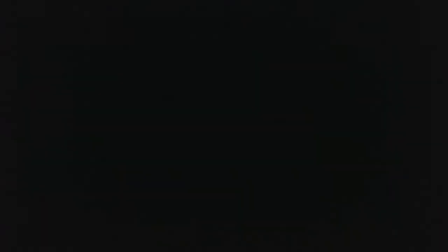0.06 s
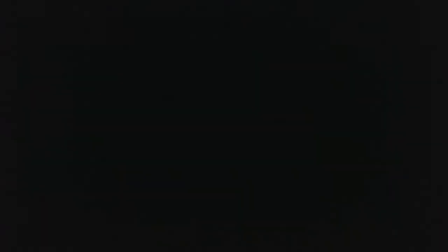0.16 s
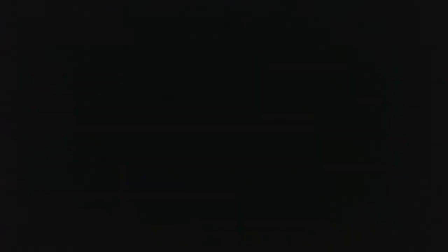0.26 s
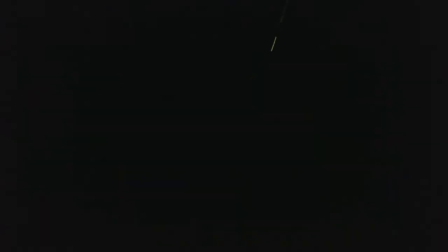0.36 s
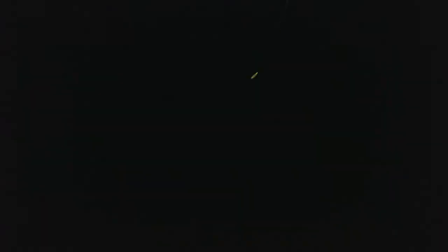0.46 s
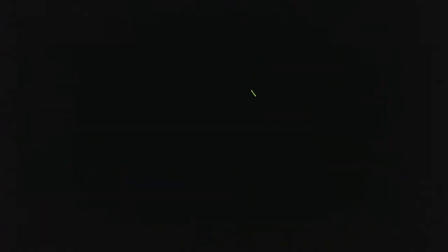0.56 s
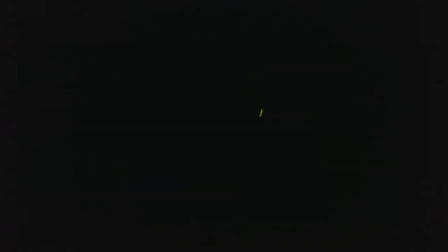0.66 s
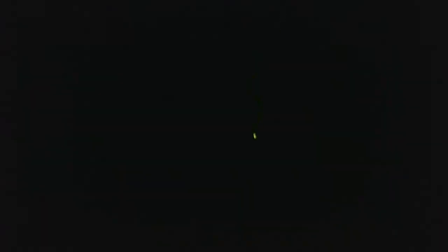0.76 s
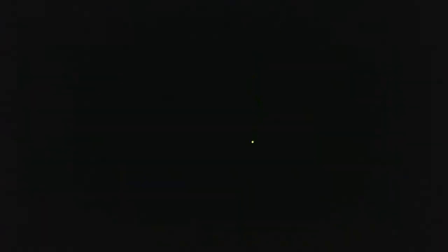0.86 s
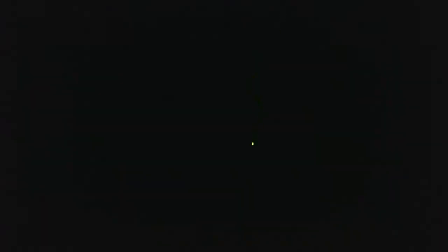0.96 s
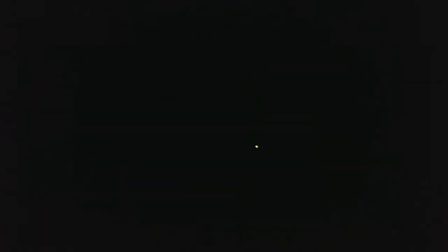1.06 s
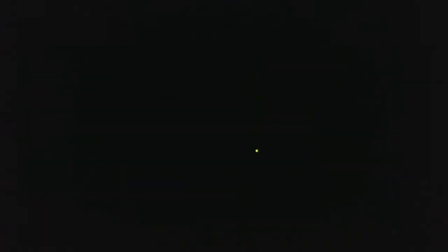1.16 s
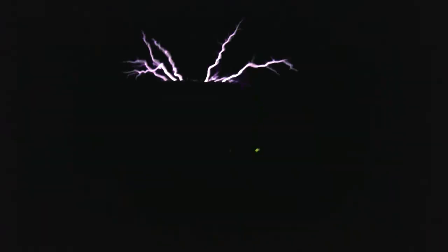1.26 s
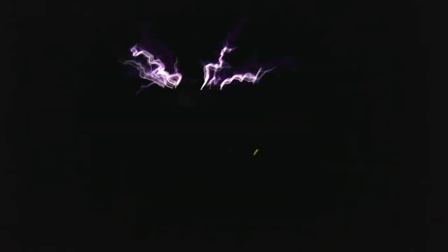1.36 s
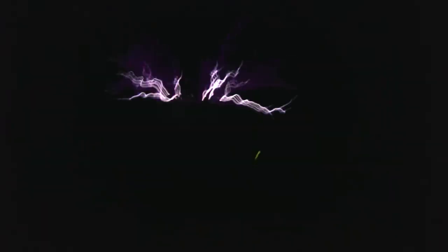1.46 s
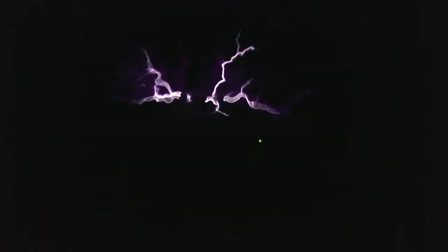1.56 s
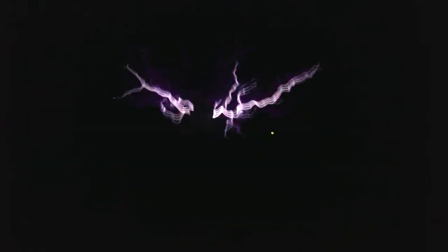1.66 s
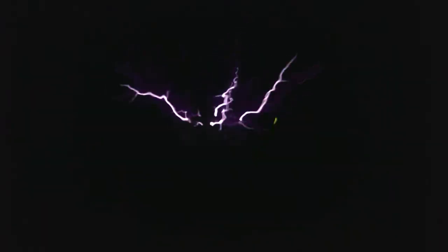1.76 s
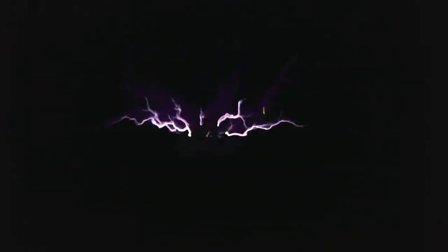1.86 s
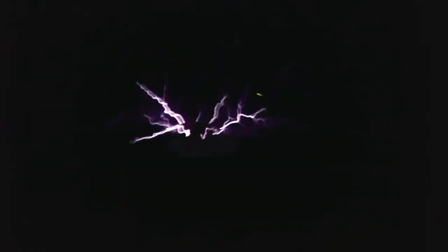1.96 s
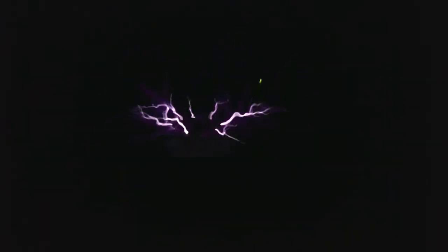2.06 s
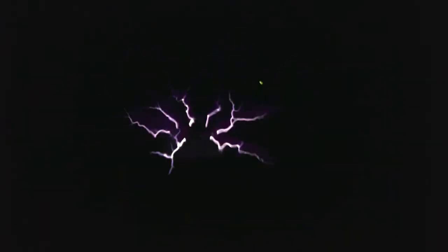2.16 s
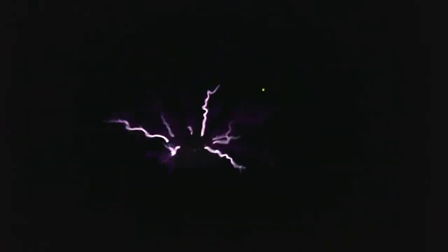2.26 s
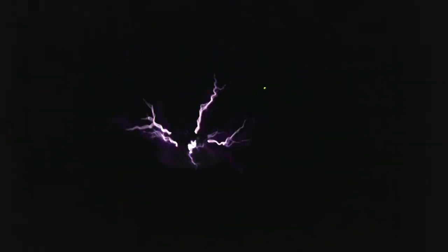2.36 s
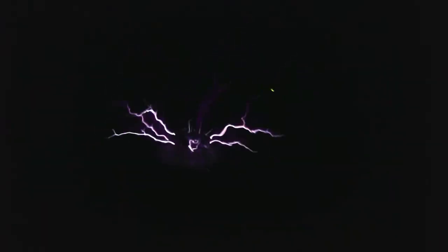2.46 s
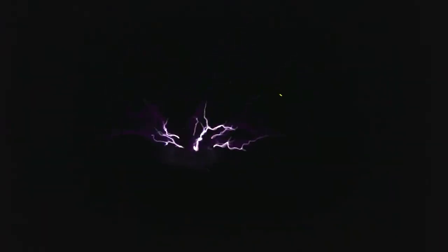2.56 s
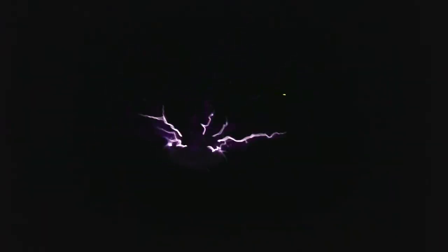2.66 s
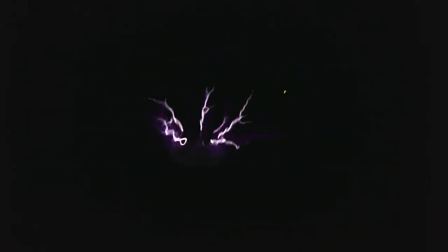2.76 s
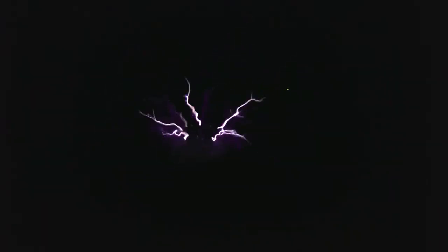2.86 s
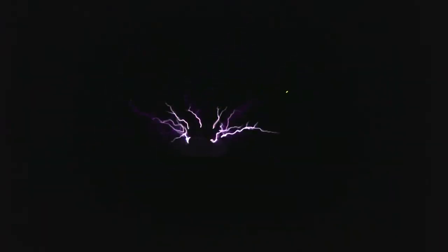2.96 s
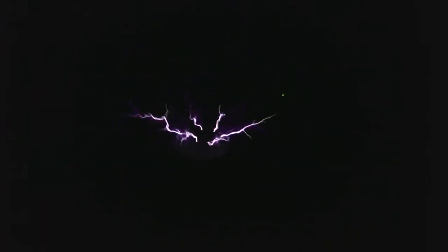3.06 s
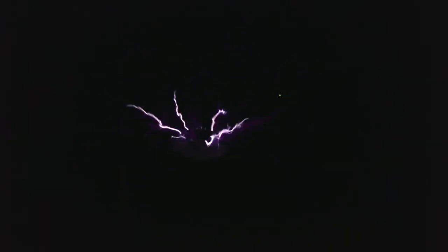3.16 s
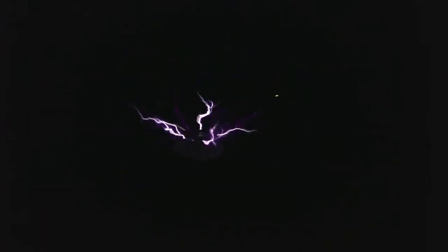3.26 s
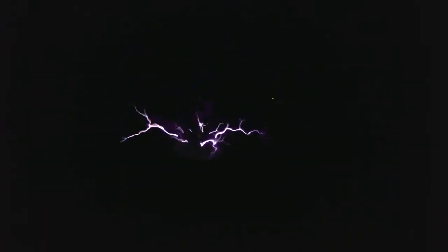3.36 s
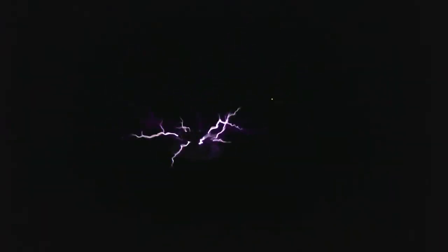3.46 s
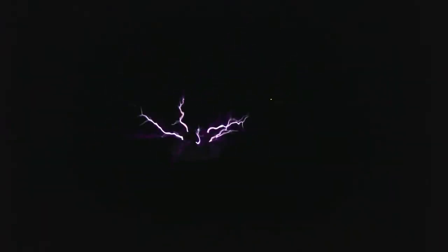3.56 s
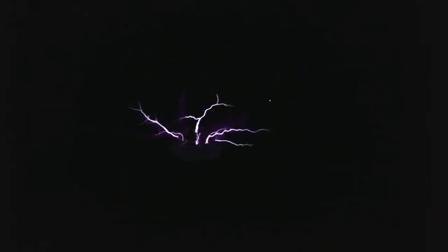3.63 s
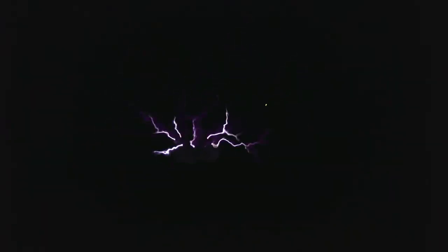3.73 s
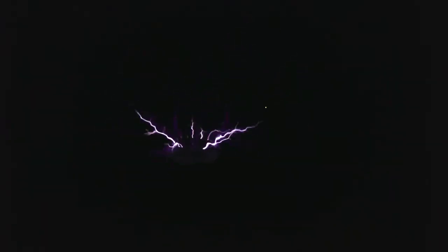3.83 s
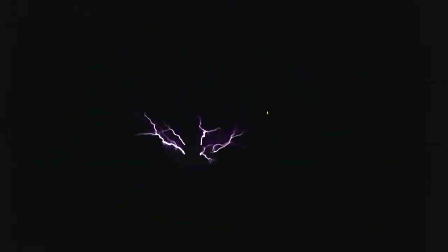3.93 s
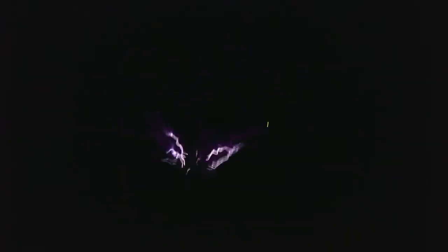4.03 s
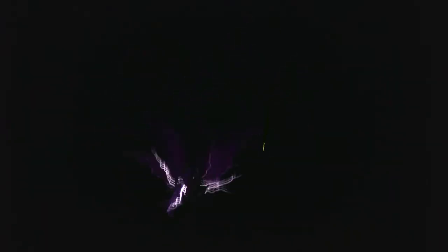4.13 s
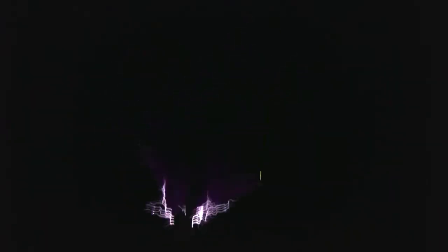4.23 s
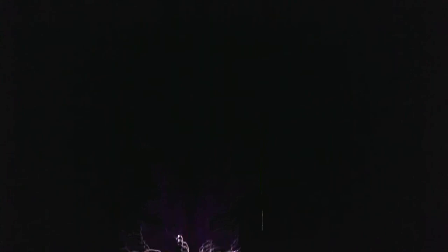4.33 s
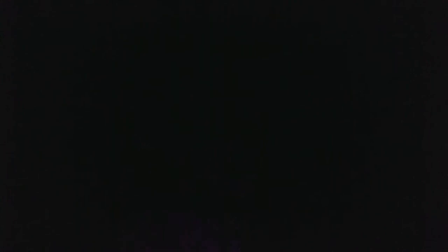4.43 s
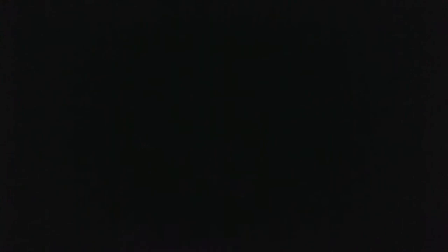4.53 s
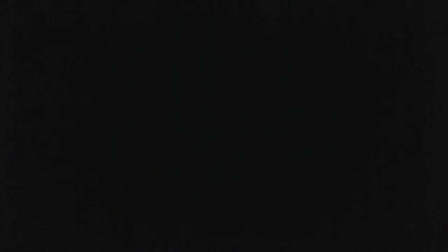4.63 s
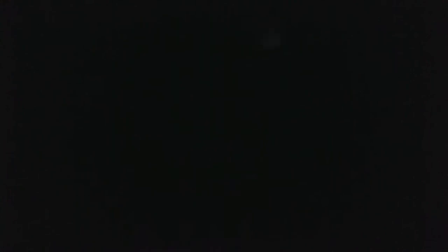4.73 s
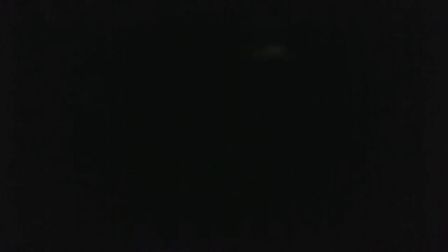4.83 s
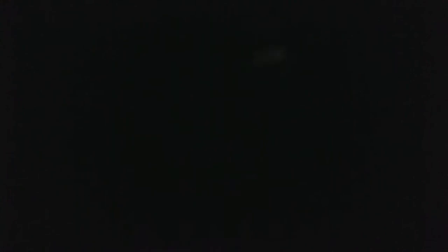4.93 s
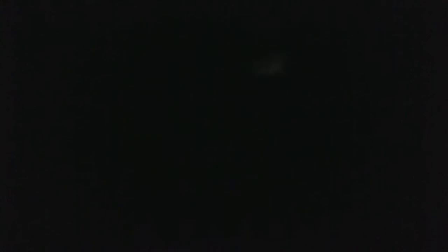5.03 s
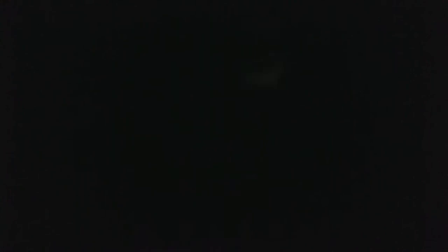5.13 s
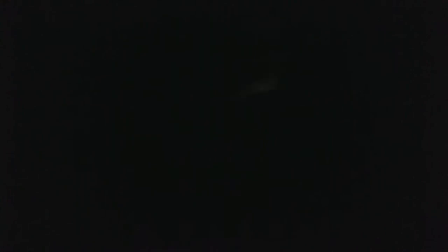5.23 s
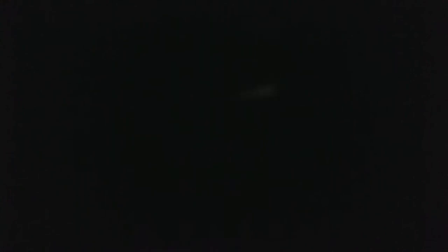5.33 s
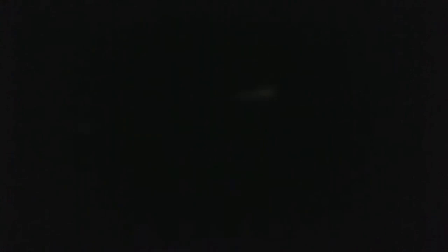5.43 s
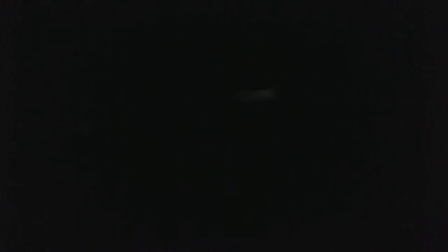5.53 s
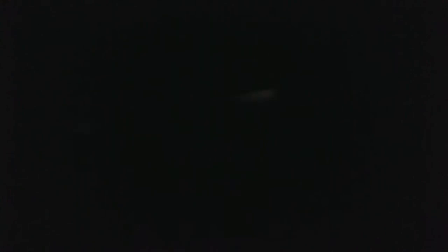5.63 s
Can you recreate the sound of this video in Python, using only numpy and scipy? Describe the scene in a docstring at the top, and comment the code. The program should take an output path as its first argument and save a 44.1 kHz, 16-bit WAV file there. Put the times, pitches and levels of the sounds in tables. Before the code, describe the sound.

After a faint rustle and a dull thud, a high-voltage coil snaps to life, its sparks sizzling loudly and steadily over a faint hum.

```python
"""A soft rustle and a small knock sound in a quiet garage, then a thud on a panel, a low throb, a faint
whine and a few ticks. A high-voltage coil switches on with a crack as the air breaks down. Dense sparks,
pulsing at twice the mains frequency, leap from several streamers, and reverberation blurs them into a
hissing crackle over the transformer hum. The listener moves through four spots, and at each the
standing waves of the room colour the crackle differently."""
import sys
import numpy as np
from scipy import signal
from scipy.fft import rfft, irfft, next_fast_len
from scipy.io import wavfile

SR = 44100
rng = np.random.default_rng(int(sys.argv[2]) if len(sys.argv) > 2 else 0)


def materialize(psi):
    """Save the field psi as 16-bit PCM at rate SR to the path in sys.argv[1].

    A 1-D psi becomes a single channel; in a 2-D psi each row is a channel.
    """
    bounded = np.clip(np.atleast_2d(psi).T, -1, 1)
    quanta = np.round(bounded * 32767).astype(np.int16)
    wavfile.write(sys.argv[1], SR, quanta)


N = 250929
TIME = np.arange(N) / SR
FFT_SIZE = next_fast_len(N + SR)
HZ = np.maximum(np.arange(FFT_SIZE // 2 + 1) * SR / FFT_SIZE, 1)
COIL_ON_S, CRACK_S, MAINS_HZ = 1.2183, 1.2299, 60


def from_db(db):
    """Amplitude grows tenfold for every 20 dB."""
    return 10 ** (np.asarray(db) / 20)

def unit_rms(x):
    """Normalisation to unit mean power."""
    return x / np.sqrt(np.mean(x ** 2) + 1e-20)

def ramp(start_s, length_s):
    """Linear rise from 0 to 1; a negative length gives a fall that ends at start_s."""
    return np.clip((TIME - start_s) / length_s, 0, 1)

def decay(start_s, t60):
    """Exponential damping: unity until the start, then 60 dB down every t60 seconds, for one second."""
    return from_db(-60 * np.clip(TIME - start_s, 0, 1) / t60)

def burst(start_s, t60):
    """White noise with a sudden onset and exponential decay."""
    return rng.standard_normal(N) * (TIME >= start_s) * decay(start_s, t60)

def spectrum(points):
    """Interpolation of a curve over logarithmic frequency."""
    hz, value = np.transpose(points)
    return np.interp(np.log(HZ), np.log(hz), value)

def cut(x, order, hz, kind="low"):
    """Maximally flat low-pass or high-pass filtering."""
    return signal.sosfilt(signal.butter(order, hz, kind, fs=SR, output="sos"), x)

def resonate(x, hz, width_hz):
    """A damped oscillator driven by x; a unit impulse rings with height 1."""
    r, w = np.exp(-np.pi * width_hz / SR), 2 * np.pi * hz / SR
    return signal.lfilter([0, np.sin(w)], [1, -2 * r * np.cos(w), r * r], x + 1e-18)

def lift(hz, width_hz, db):
    """Frequency response of one resonant peak or dip."""
    return 1 + (from_db(db) - 1) / (1 + 2j * (HZ - hz) / width_hz)

def microphones(mid, side, coherence, colour=1):
    """Partial coherence: shared (mid) and opposed (side) spectra add into left and right signals."""
    alike = np.clip(spectrum(coherence), -1, 1)
    mid, side = colour * np.sqrt(1 + alike) * mid, colour * np.sqrt(1 - alike) * side
    return irfft(np.array([mid + side, mid - side]), FFT_SIZE)[:, :N] / np.sqrt(2)

def stereo_noise(colour, coherence):
    """A partly coherent noise field of unit power with a given spectral shape."""
    mid, side = rfft(rng.standard_normal((2, N)), FFT_SIZE)
    return unit_rms(microphones(mid, side, coherence, colour))

def garage(x, echo_db, t60=0.7, treble_t60=0.32, early_db=8.5, early_t60=0.086):
    """Reverberation: direct sound plus a diffuse tail whose treble dies first, as (mid, side) spectra."""
    t = np.arange(int(.7 * SR)) / SR
    noise = rng.standard_normal((2, len(t)))
    dull = cut(noise, 1, 3000)
    tail = dull * from_db(-60 * t / t60) + (noise - dull) * from_db(-60 * t / treble_t60)
    tail *= 1 + from_db(early_db - 60 * t / early_t60)   # near walls and floor reflect strongly
    tail *= np.clip(t / 0.0029 - 1, 0, 1)   # reflections arrive after the direct sound
    tail *= from_db(echo_db) / np.sqrt(np.sum(tail ** 2, axis=1, keepdims=True))
    tail[:, 0] = 1.15, .3   # the direct sound is mostly shared
    return rfft(x, FFT_SIZE) * rfft(tail, FFT_SIZE)


# Background spectrum. Each row: frequency in Hz, relative spectral density in dB.
ROOM_SPECTRUM = [(15, -44), (25, -29), (91, -0.5), (433, -2), (632, -2.5), (998, -9.5), (1380, -11),
                 (1540, -14), (1710, -12), (7310, -20.5), (15500, -26)]
# Likeness of left and right in the quiet room. Each row: frequency in Hz, coherence from -1 to 1.
QUIET_COHERENCE = [(60, 0.98), (180, 0.62), (550, -0.022), (1650, 0.18), (4970, 0.25), (15000, -0.41)]

def room_tone(start_db=-49.5, sink_db=4.5, under_coil_db=-81):
    """Broadband ambient noise sinks after the thud and drops away at the main crack."""
    level_db = np.where(TIME < CRACK_S, start_db - sink_db * ramp(0.55, 0.36), under_coil_db)
    return from_db(level_db) * stereo_noise(from_db(spectrum(ROOM_SPECTRUM)), QUIET_COHERENCE)


def rustle(level_db=-53, end_s=0.42):
    """Noise in one heavily damped resonance makes a soft, pitchless sound that fades away."""
    noise = unit_rms(resonate(rng.standard_normal(N), hz=1530, width_hz=1900))
    return from_db(level_db) * noise * ramp(end_s, -0.2)


# Small knocks and ticks. Each row: start in seconds, peak level in dB, resonance in Hz, bandwidth in Hz,
# 60 dB decay time of the burst in seconds, share sent into the room's echo from 0 to 1.
TICKS = [(0.1939, -30.5, 874, 130, 0.06, 0.6), (0.199, -38, 2500, 200, 0.03, 0.9),
         (0.252, -27, 7460, 4500, 0.015, 1), (0.2494, -36, 890, 250, 0.044, .9),
         (.266, -42, 9000, 4000, .02, .8), (.4515, -44, 6300, 1200, .012, .8),
         (.62, -50, 6500, 2000, .01, .5), (0.6503, -27.5, 4570, 4500, 0.0056, .2),
         (0.6735, -43, 5600, 1800, .012, .2), (.995, -56, 3500, 300, .04, .3),
         (1.14, -52, 3500, 300, .04, .3), (1.167, -43, 5500, 3000, 0.022, .5),
         (1.198, -26.5, 6800, 1800, 0.046, 0.6), (1.212, -25, 6400, 3000, 0.12, .6)]

def ticks():
    """Transient excitation: each burst rings one resonance; distance splits it into near and far parts."""
    near, far = 0, 0
    for start, db, hz, width, t60, echoed in TICKS:
        tick = resonate(np.diff(burst(start, t60), prepend=0), hz, width)
        tick = from_db(db) * tick / np.max(np.abs(tick))
        near, far = near + (1 - echoed) * tick, far + echoed * tick
    return near, far


# Low throbs. Each row: start in seconds, hold in seconds, level in dB, frequency in Hz.
THROBS = [(0.433, 0.075, -43, 91), (0.592, .03, -52, 92), (.68, .02, -50, 86), (0.723, 0.095, -48.5, 95),
          (0.864, .03, -54, 92), (0.967, .11, -51.5, 89)]

def throbs(attack_s=0.016, t60=.17):
    """Amplitude envelopes make each low pure tone swell, hold and die exponentially."""
    out = 0
    for start, hold, db, hz in THROBS:
        swell = ramp(start, attack_s) * decay(start + attack_s + hold, t60)
        out += from_db(db) * swell * np.sqrt(2) * np.sin(2 * np.pi * hz * TIME)
    return out


# Blows on the panel. Each row: start in seconds, level in dB, relative level of first contact in dB.
BLOWS = [(0.4388, -27.5, 5), (0.4507, -26.5, 1), (0.467, -31, 11), (0.48, -38, 5), (0.492, -34.5, 11),
         (0.526, -38, -1), (.561, -40, 1), (.59, -39, -3), (.618, -40, -3)]
# Bending modes of the panel. Each row: frequency in Hz, gain in dB, 60 dB decay time in seconds.
PANEL_MODES = [(277, -42, 0.16), (300, -47, 0.13), (427, -34, 0.066), (646, -41, 0.071), (780, -25, 0.021),
               (930, -31, 0.013), (1150, -35, 0.057), (1370, -36, 0.036), (2414, -39, 0.13),
               (2550, -35, 0.08), (2605, -40, 0.098), (3270, -33, .025)]

def panel(unevenness_db=3, clatter_db=-0.5, contact_hz=2900):
    """Forced modal vibration: each blow sets loose parts clattering, which drives the modes unevenly."""
    out = 0
    scatter_db = unevenness_db * rng.standard_normal((len(BLOWS), len(PANEL_MODES)))
    for (start, db, strike_db), offsets_db in zip(BLOWS, scatter_db):
        clatter = burst(start, t60=0.092)
        rings = sum(from_db(mode_db + offset) * resonate(clatter, hz, np.log(1000) / np.pi / t60)
                    for (hz, mode_db, t60), offset in zip(PANEL_MODES, offsets_db))
        strike = from_db(strike_db) * burst(start, t60=0.018)
        out += from_db(db) * (rings + from_db(clatter_db) * clatter + strike)
    softened = cut(out, 4, contact_hz)   # a soft contact passes little treble
    return cut(softened, 2, 225, "high")


def whine(hz=840, level_db=-64.5, start_s=.6):
    """A faint pure tone fades in."""
    return from_db(level_db) * np.sin(2 * np.pi * hz * TIME) * ramp(start_s, .2)


# Spectrum of the sparks. Each row: frequency in Hz, relative spectral density in dB.
SPARK_SPECTRUM = [(30, -70), (60, -33), (100, -30), (170, -26), (225, -24), (400, -13.5), (470, -16),
                  (560, -9), (1000, -9), (1400, -6.5), (2000, -3), (4000, -0.5), (6000, -1.5), (7700, -0.5),
                  (13000, 0.5), (15600, -2.5)]
# Likeness of left and right for the sparks. Each row: frequency in Hz, coherence from -1 to 1.
SPARK_COHERENCE = [(60, .2), (150, 0.11), (270, 0.41), (450, 0.83), (740, 0.87), (1200, 0.95), (1700, 1),
                   (2400, 0.99), (3300, 0.92), (5500, 0.47), (9000, 0.3), (15000, 0.039)]
# The first breakdowns. Each row: start in seconds, level in dB, rise in seconds,
# 60 dB decay time in seconds, ring frequency in Hz, relative ring level in dB.
BREAKDOWNS = [(1.2183, -3, 0.0084, 0.037, 2120, -3), (1.2196, -15, 0.0032, 0.042, 880, 6),
              (1.23, 7.5, 0.00037, 0.013, 6400, -5), (1.239, -12, 0.001, 0.043, 1940, -9)]

def switch_on(side_db=-7, ring_width_hz=400):
    """Dielectric breakdown of air: short noise bursts near the centre, each with a ring."""
    white = rng.standard_normal((2, N)) * from_db([[0], [side_db]])
    mid, side = rfft(white, FFT_SIZE)
    bright = unit_rms(microphones(mid, side, SPARK_COHERENCE, from_db(spectrum(SPARK_SPECTRUM))))
    out = 0
    for start, db, rise, t60, hz, ring_db in BREAKDOWNS:
        ring = unit_rms(resonate(np.diff(rng.standard_normal(N + 1)), hz, ring_width_hz))
        noise = unit_rms(bright + from_db(ring_db) * ring)
        out += from_db(db) * noise * ramp(start, rise) * decay(start, t60)
    return out


# Standing waves of the garage. Each row: frequency in Hz, bandwidth in Hz,
# then the gain in dB at each of the four listening spots.
ROOM_MODES = [(260, 9, 3, 1, 9, 4), (325.4, 12.5, 8, 2, 6.5, 2), (361, 8.1, 3, -4, 5.5, 4),
              (382, 17, 4, 3, 3.5, 11), (426.6, 7.7, 11.5, 4, 9, 9), (512, 9.6, 3, -3, 9, 7),
              (555, 10.3, 6, 12.5, 11, 5), (587, 19, 6, -2, 2, 6.5), (640, 9, -5, -12, 4, 0),
              (698, 25, 6.5, 9.5, 4, 7.5), (734, 9.2, -2, 6.5, 8.5, 4), (835, 50, 0, -13, -0.5, 1),
              (885, 12, 2, 1, 1.5, 7.5), (912, 19, -2, 4, 1.5, -5)]

def sparks_at_spot(trains, spot, echo_db=8.5):
    """Superposition: each streamer's sparks take their own paths, coloured by the local standing waves."""
    presence_db = (1.5, 2.2, 3, 3.5)[spot]
    stereo_width_db = (-1.2, -0.073, 0.22, .9)[spot]
    left_lead = (.1, .2, .25, .3)[spot]   # share of the mid that reaches the left microphone early
    mid, side = sum(garage(train, echo_db) for train in trains)
    mid = mid * lift(7740, 1530, presence_db)
    side = from_db(stereo_width_db) * side + 1j * left_lead * mid
    for hz, width, *gains_db in ROOM_MODES:   # standing waves reach both microphones alike
        mid = mid * lift(hz, width, gains_db[spot])
    return microphones(mid, side, SPARK_COHERENCE, from_db(spectrum(SPARK_SPECTRUM)))

def choose_streamers(count, flare_db=16, flares_per_s=5):
    """Weighted chance picks a streamer for each instant; the weights wander, so streamers flare in turn."""
    knots = rng.standard_normal((count, int(N / SR * 20) + 2))
    wander = np.array([np.interp(TIME * flares_per_s, np.arange(len(row)), row) for row in knots])
    shares = np.cumsum(from_db(flare_db * wander), axis=0)
    return np.sum(shares / shares[-1] < rng.random(N), axis=0)

def streamers(drive, count=5, sparks_per_s=3000, spread_db=2, moves_s=(2.5, 3.33, 4.95), step_s=0.082):
    """Shot noise: sparks are random pressure impulses, heard from one spot after another."""
    fired = rng.random(N) < sparks_per_s / SR
    sizes = from_db(spread_db * np.minimum(rng.exponential(1, N), 3.0))
    polarity = np.where(rng.random(N) < .7, 1, -1)   # most sparks begin with overpressure
    sparks = fired * sizes * polarity * drive
    streamer = choose_streamers(count)
    arrived = [ramp(move - step_s / 2, step_s) for move in moves_s]
    crackle = 0
    for spot, (come, gone) in enumerate(zip([1] + arrived, arrived + [0])):
        here = sparks * np.sqrt(np.clip(come - gone, 0, 1))   # equal-power change of spot
        crackle += sparks_at_spot([here * (streamer == k) for k in range(count)], spot)
    return unit_rms(crackle)

def corona(drive, level_db=-5.5, above_hz=6850):
    """Corona discharge: a high hiss beside the sparks, its power proportional to the drive."""
    hiss = stereo_noise(1 / np.sqrt(1 + (above_hz / HZ) ** 4), SPARK_COHERENCE)
    return from_db(level_db) * unit_rms(hiss * np.sqrt(drive))


# Strength of the discharge. Each row: time in seconds, level in dB.
DISCHARGE_LEVEL = [(1.25, -16), (1.31, -16), (2.38, -15.5), (2.57, -17.5), (3.15, -17), (3.33, -17.5),
                   (3.6, -16.5), (3.72, -17.8), (3.9, -17), (4.91, -18), (5.69, -17.5)]

def discharge(mains_depth=0.31, settle_s=0.18):
    """Amplitude modulation: sparks and corona are strongest at both peaks of each mains cycle."""
    drive = ramp(COIL_ON_S, 0.0057) * (1 + mains_depth * np.cos(4 * np.pi * MAINS_HZ * TIME))
    crackle = streamers(drive) + corona(drive)
    treble_db = 0.5 + 3 * np.exp(-np.abs(TIME - COIL_ON_S) / settle_s)   # brightest at switch-on
    extra_treble = (from_db(treble_db) - 1) * cut(crackle, 2, 9000, "high")
    level_db = np.interp(TIME, *np.transpose(DISCHARGE_LEVEL))
    return from_db(level_db) * (crackle + extra_treble)


# Transformer hum. Each row: time in seconds, then the levels in dB of mains harmonics 2 and 4.
HUM_LEVELS = [(1.22, -59, -59), (2.5, -60.5, -68), (3.299, -63.5, -60), (3.8, -61, -56),
              (4.4, -64.5, -60.5), (5.69, -67.5, -60.5)]

def hum(harmonics=(2, 4), left_leads_rad=(.3, .7)):
    """Forced vibration: the transformer core buzzes at even multiples of the mains frequency."""
    times, *levels_db = np.transpose(HUM_LEVELS)
    out = 0
    for k, db, lead in zip(harmonics, levels_db, left_leads_rad):
        phase = 2 * np.pi * k * MAINS_HZ * TIME + lead * np.array([[.5], [-.5]])
        out += from_db(np.interp(TIME, times, db)) * np.sqrt(2) * np.sin(phase)
    return out * ramp(COIL_ON_S, .02)


def main_crack(length_s=0.00039, snap_db=3.5, ring_db=-18, thump_db=-42):
    """An impulsive transient: a sharp snap with a short ring and a low thump."""
    cycle = (TIME - CRACK_S) / length_s
    snap = -from_db(snap_db) * np.sin(2 * np.pi * cycle) * (cycle > 0) * (cycle < 1)
    impulse = np.arange(N) == int(CRACK_S * SR)
    ring = from_db(ring_db) * resonate(impulse, hz=850, width_hz=150)
    thump = from_db(thump_db) * resonate(impulse, hz=110, width_hz=220)
    return snap - ring + thump


def scene(small_side_db=-16):
    """Linear superposition of all sources at two microphones; the small sounds sit near the centre."""
    near_ticks, far_ticks = ticks()
    mid, side = garage(panel() + far_ticks + rustle(), echo_db=-0.5)
    small_sounds = near_ticks + microphones(mid, from_db(small_side_db) * side, QUIET_COHERENCE)
    coil = discharge() + switch_on() + hum() + main_crack()
    tones = (throbs() + whine()) * ramp(CRACK_S + 0.038, -0.055)   # they fade as the coil starts
    return room_tone() + small_sounds + tones + coil

def record(dry, low_hz=54.7, clip_level=.88, top_hz=15740):
    """Band limiting and saturation: the microphones lose deep bass, the crack clips, the top is cut."""
    clipped = np.clip(cut(dry, 2, low_hz, "high"), -clip_level, clip_level)
    return signal.sosfilt(signal.ellip(14, .3, 62, top_hz, fs=SR, output="sos"), clipped)


dry = scene()
out = record(dry)
materialize(out)
```